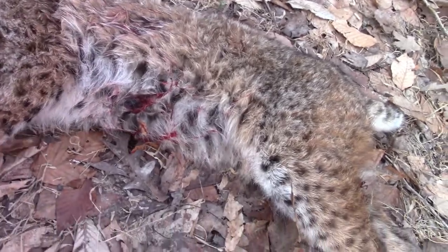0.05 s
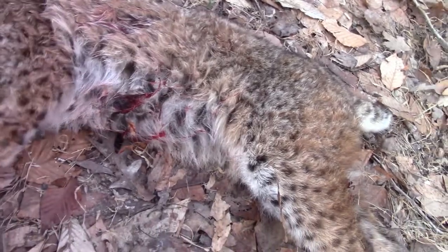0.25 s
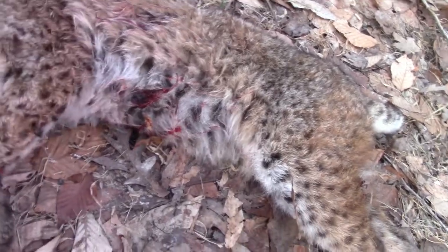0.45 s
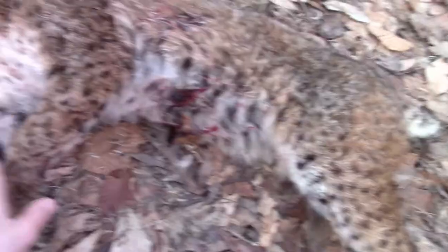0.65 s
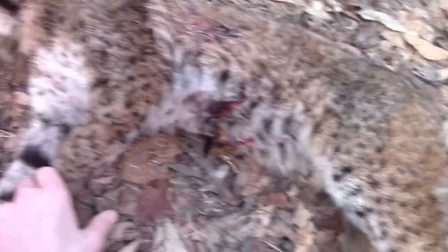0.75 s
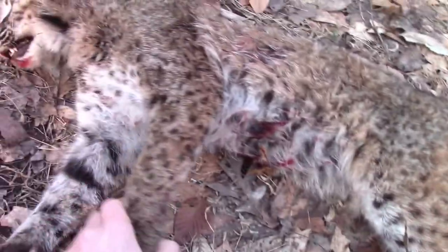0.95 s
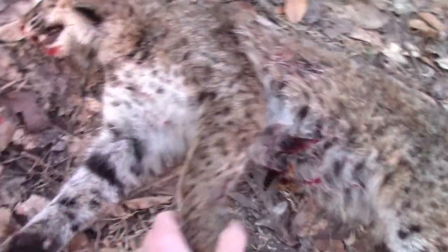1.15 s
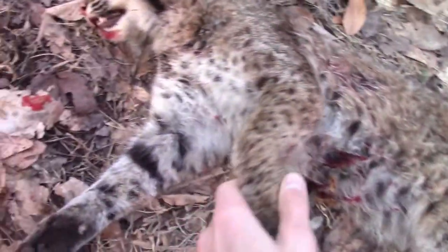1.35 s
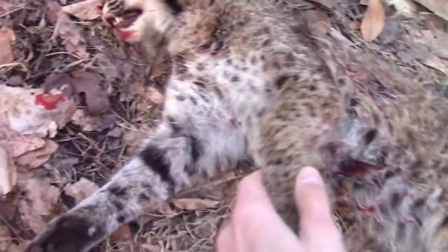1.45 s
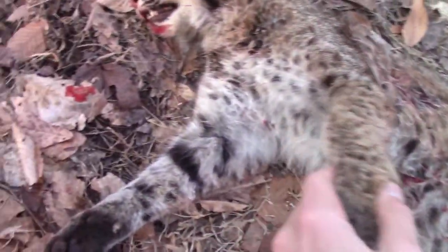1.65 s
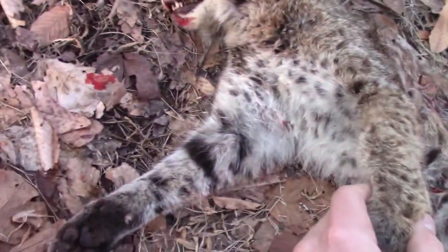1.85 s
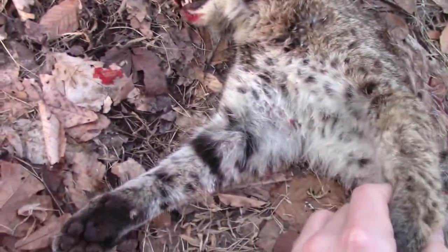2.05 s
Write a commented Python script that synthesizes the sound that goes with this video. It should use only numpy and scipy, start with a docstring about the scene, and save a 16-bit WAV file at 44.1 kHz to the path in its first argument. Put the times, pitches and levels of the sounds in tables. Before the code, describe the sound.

Faint crackling of dry leaf litter under a handled animal, one sharp snap, then scattered small ticks

```python
"""Furry body on dry leaves

A hand shifts a furry body on a bed of dry leaves outdoors, heard close by in stereo.
The litter rustles as dense tiny cracks that ring small resonators; one handful is crushed sharply.
Single leaves and stems snap as short bursts with ringing tones, and something hollow is tapped once.
Quiet air lies below as shaped, almost uncorrelated stereo noise.
"""
import sys
import numpy as np
from scipy import signal
from scipy.fft import rfft, irfft
from scipy.io import wavfile
from scipy.ndimage import map_coordinates

SR = 44100
rng = np.random.default_rng(int(sys.argv[2]) if len(sys.argv) > 2 else 0)


def generate_wav(sig):
    """Save sig (samples, or channels by samples) to the path in sys.argv[1] as 16-bit PCM at SR."""
    pcm = np.round(np.clip(np.atleast_2d(sig).T, -1, 1) * 32767).astype(np.int16)
    wavfile.write(sys.argv[1], SR, pcm)


N = 92610  # length in samples

# Stirring of the litter: start_s, level_db, treble_db (treble above level)
STIRRING = [(0, -53.5, -1.5), (.06, -54, 0.5), (.12, -60.5, 3), (.16, -47, -7.5), (.2, -52.5, -0.5),
            (.28, -55, 4), (.32, -62, 1), (.365, -55, 0.5), (.41, -47, 0), (.46, -57, 1), (.51, -61, -2.5),
            (.64, -69.5, 0), (.71, -56.5, -4), (.74, -57.5, -5.5), (.785, -51, -7), (.82, -60.5, -3),
            (.92, -62, -1.5), (.945, -54, -2), (1.0, -57, 3.5), (1.1, -59, 1), (1.18, -61, 1),
            (1.3, -56.5, -0.5), (1.4, -61.5, 1), (1.48, -57.5, -0.5), (1.62, -63, -0.5), (1.75, -62.5, -1),
            (1.92, -69, 0), (1.98, -71, -1), (2.04, -67.5, 3.5), (2.1, -70, 1)]
# Where the hand works: start_s, pan_db (left minus right)
HAND_PATH = [(0, 2.4), (.47, 2.4), (.6, 1), (1.1, .6), (1.3, 0), (2.1, 0)]
# The crushed handful: start_s, level_db, treble_db (treble above level)
CRUSHING = [(.2, -57, -7), (.216, -42, -6), (.220, -42, -6), (.2225, -28.5, -7), (.228, -23.5, -2),
            (.234, -26.5, 3), (.238, -30.5, 7.5), (.2405, -41, -2), (.25, -45.5, 8), (.256, -46.5, 3),
            (.272, -64, 5)]
# Single breaks: start_s, level_db (peak of the ringing body), pitch_hz, crack_db (crack against body)
SNAP_EVENTS = [(0.0257, -32, 1870, -12), (0.163, -31.5, 1440, -8), (0.2067, -34, 2990, -3),
               (0.2208, -25, 1100, -15), (0.225, -11.5, 2020, -22), (0.2321, -13.5, 1920, -14),
               (0.234, -11.5, 2640, -13), (0.2375, -31, 1080, -10), (0.3331, -37.5, 663, -10),
               (0.9241, -42.5, 2020, 2.5), (0.9771, -36.5, 2200, -5), (0.9939, -38, 2020, -2),
               (1.0085, -41, 2700, -6), (1.016, -41, 1510, 0), (1.0472, -46.5, 1800, 8.5),
               (1.0497, -40, 2640, 6.5), (1.0908, -37.5, 1590, 2), (1.1248, -47, 670, 2),
               (1.1995, -46.5, 1110, -3), (1.2209, -48.5, 2730, 14), (1.2642, -28, 1840, 0.5),
               (1.2938, -42.5, 1680, -6), (1.2962, -43, 1500, 8), (1.3092, -37, 1070, -12),
               (1.311, -44, 2520, 4), (1.3135, -49.5, 404, 0), (1.3295, -46, 2500, 7),
               (1.3315, -44.5, 890, 8.5), (1.3339, -34, 1890, -9), (1.3792, -40, 1420, 5),
               (1.3919, -26.5, 1370, 2), (1.3954, -32.5, 1240, 3), (1.431, -43.5, 2300, 7),
               (1.4366, -44, 770, 2), (1.4525, -40, 1800, 1), (1.4692, -33, 1620, -5),
               (1.4708, -43, 2480, -6), (1.4843, -44.5, 2400, 5.5), (1.4931, -43, 2250, -5),
               (1.5, -47, 1230, 0), (1.5236, -38.5, 2600, -2.5), (1.5515, -48.5, 2400, 6),
               (1.5543, -37, 2000, -2), (1.5713, -53, 2110, 8), (1.59, -27, 1580, -11),
               (1.6068, -38, 2280, -11), (1.7155, -39.5, 2600, -5), (1.7689, -27, 1780, -4.5),
               (1.7702, -44, 760, -6), (1.809, -42, 1760, -4), (1.8185, -45, 2820, 0),
               (1.8499, -48, 2340, 9.5), (1.909, -37.5, 1720, -6), (2.034, -53, 1600, 8.5)]
# Colour of the leaves by leaf pitch: pitch_hz, level_db (relative)
LEAF_COLOUR = [(350, -56), (500, -22), (750, -7), (1300, -4), (2000, -1), (2900, -1), (4000, -15),
               (6100, -7), (8500, -13.5), (11400, -23), (15000, -28)]
# Colour of the outdoor air: pitch_hz, level_db (relative)
AIR_COLOUR = [(12, -43), (20, -11.5), (146, -12), (660, -0.5), (1260, -6), (1570, 1.5), (2140, -8),
              (2530, -5), (3440, -7), (6010, -11), (13500, -23), (16000, -40)]
# How alike the air is on left and right: pitch_hz, correlation (0 to 1)
AIR_LIKENESS = [(30, 0.051), (15000, 0.067)]
# Tones of a snapped leaf: pitch_ratio, share (signed amplitude)
SNAP_PARTIALS = [(1, 0.95), (1.68, -0.42)]
# Tones of the hollow knock: pitch_hz, level_db, t60_s (time to fall 60 dB)
KNOCK_TONES = [(462, -52, 0.16), (520, -45, 0.018), (1000, -52, .01)]

# Stereo: the louder side also hears it earlier; the heaps spread by up to SCATTER_US
LEAD_US_PER_DB, SCATTER_US = 8, 26
# Rustle: the spread is the mean of a random boost, the clump the size of a slow drift
CRACKS_PER_S, CRACK_SPREAD_DB, CLUMP_DB = 12000, 0.5, 2
LEAF_CYCLES = 6.6  # cycles of a leaf's pitch in its t60
LEAF_SIZES, ONE_LEAF_REACH, HEAPS = 36, .3, 4  # reach in leaf sizes
TREBLE_FROM_HZ = 3800
THIN_HZ = 271  # small dry leaves radiate little bass
# Lone ticks once the body is dragged: level against the rustle, reach in leaf sizes
TICKS_FROM_S, TICKS_PER_S, TICK_SPREAD_DB, TICK_DB, TICK_REACH = .92, 250, 2, -4, 2.2
# Crush: the handful booms a little, then is thinned
CRUSH_PER_S, CRUSH_SPREAD_DB, CRUSH_CLUMP_DB = 20500, 2.5, 2.5
HEAP_HZ, HEAP_DB, HEAP_T60_S, CRUSH_THIN_HZ = 770, -19.5, .007, 634
# Snaps: the run of small breaks dies 40 dB in SNAP_S; the body is thin below a share of its pitch
SNAP_S, SNAP_CYCLES, SNAP_THIN = 0.0042, 5.2, 0.62
CRACK_HZ, CRACK_TOP_HZ = 3340, 8740
CRACK_RING_HZ, CRACK_RING_T60_S, CRACK_RING = 6150, 0.0017, 0.18  # one favoured bright tone
KNOCK_S, KNOCK_THIN_HZ = 1.6815, 340
AIR_DB = -60.5
CUTOFF_HZ = 16600


def amp(db):
    """Decibels to amplitude."""
    return 10 ** (np.asarray(db) / 20)


def rms_one(x):
    """Bring a sound to an RMS of 1."""
    return x / np.sqrt(np.mean(x ** 2) + 1e-20)


def in_time(rows, **ends):
    """Draw each table column as a line over the scene."""
    s, *columns = np.transpose(rows)
    return [np.interp(np.arange(N) / SR, s, c, **ends) for c in columns]


def at_hz(points, hz):
    """Read a colour curve along log pitch."""
    curve_hz, values = np.transpose(points)
    return np.interp(np.log(hz), np.log(curve_hz), values)


def drift(rate_hz):
    """Slow random motion with an RMS of 1: noise through a two-pole lowpass."""
    r = np.exp(-2 * np.pi * rate_hz / SR)
    noise = rng.standard_normal(N + SR)
    return rms_one(signal.lfilter([1], [1, -2 * r, r * r], noise)[SR:])  # skip the settling


def highpass(x, hz, order):
    """Thin a sound with a Butterworth highpass."""
    return signal.sosfilt(signal.butter(order, hz, "high", fs=SR, output="sos"), x)


def ring(clicks, hz, t60_s):
    """Damped resonator: a unit click sets a sine of about height 1 ringing."""
    r, w = amp(-60 / (t60_s * SR)), 2 * np.pi * hz / SR
    return signal.lfilter([0, np.sin(w)], [1, -2 * r * np.cos(w), r * r], clicks + 1e-18)


def place(x, extra_us=0):
    """Level and time differences between left and right follow the hand."""
    pan_db, = in_time(HAND_PATH)
    half_lead = (LEAD_US_PER_DB * pan_db + extra_us) * SR / 2e6  # in samples
    sides = []
    for side in (1, -1):
        shifted = map_coordinates(x, [np.arange(N) + side * half_lead], order=3)
        sides.append(amp(side * pan_db / 2) * shifted)
    return np.array(sides)


def cracks(level_db, treble_db, per_s, spread_db, clump_db, reach=ONE_LEAF_REACH):
    """Random clumped cracks, each swelling and dying in a leaf or, with reach, its neighbours in size."""
    clump = clump_db * drift(70)
    boost_db = spread_db * np.minimum(rng.exponential(1, N), 5) + clump
    sizes = amp(boost_db) * rng.choice([-1, 1], N)
    born = sizes * (rng.random(N) < per_s / SR)
    pitches = np.geomspace(400, 15000, num=LEAF_SIZES)
    odds = np.sqrt(pitches)  # small leaves crack oftener
    dealt = rng.choice(LEAF_SIZES, N, p=odds / odds.sum())
    low, high = np.zeros((2, HEAPS, N))
    for k, hz in enumerate(pitches):
        t60_s = LEAF_CYCLES / hz
        struck = born * np.exp(-((dealt - k) / reach) ** 2)
        leaf = rms_one(ring(ring(struck, hz, t60_s), hz, t60_s))  # two in a row swell, then die
        leaf = leaf * amp(at_hz(LEAF_COLOUR, hz)) * np.sqrt(hz)
        band = low if hz < TREBLE_FROM_HZ else high
        band[k % HEAPS] += leaf
    low = low / low.sum(0).std()
    high = high / high.sum(0).std()
    heaps = amp(level_db) * (low + amp(treble_db) * high)
    # each heap lies at its own angle
    return sum(place(h, SCATTER_US * z) for h, z in zip(heaps, np.linspace(-1, 1, num=HEAPS)))


def rustle():
    """The stirred litter: dense cracks, each in about one leaf, with lone wider ticks later."""
    stir_db, treble_db = in_time(STIRRING)
    litter = cracks(stir_db, treble_db, CRACKS_PER_S, CRACK_SPREAD_DB, CLUMP_DB)
    ticks = cracks(stir_db + TICK_DB, treble_db, TICKS_PER_S, TICK_SPREAD_DB, CLUMP_DB, TICK_REACH)
    return litter + (np.arange(N) > TICKS_FROM_S * SR) * ticks


def crush():
    """A crushed handful: denser cracks also excite a short boom in the heap, with the bass thinned."""
    level_db, treble_db = in_time(CRUSHING, left=-99, right=-99)
    handful = cracks(level_db, treble_db, CRUSH_PER_S, CRUSH_SPREAD_DB, CRUSH_CLUMP_DB)
    boomy = handful + amp(HEAP_DB) * ring(handful, HEAP_HZ, HEAP_T60_S)
    return highpass(boomy, CRUSH_THIN_HZ, 3)


def snaps():
    """One break and a dying run of smaller ones ring two leaf tones, with a bright noisy crack."""
    out, t = np.zeros(N + SR), np.arange(1500) / SR
    fade = amp(-40 * t / SNAP_S)
    crack_top = signal.butter(2, CRACK_TOP_HZ, fs=SR, output="sos")
    noises = rng.standard_normal((len(SNAP_EVENTS), 2, len(t)))
    for (start_s, level_db, hz, crack_db), (breaks, hiss) in zip(SNAP_EVENTS, noises):
        burst = 0.38 * breaks * fade * (np.abs(breaks) > 1.5)  # only the strong breaks
        burst[0] = 2
        body = sum(share * ring(burst, ratio * hz, SNAP_CYCLES / hz) for ratio, share in SNAP_PARTIALS)
        body = highpass(body, SNAP_THIN * hz, 5)
        crack = signal.sosfilt(crack_top, highpass(hiss * fade, CRACK_HZ, 2))
        crack = crack + CRACK_RING * ring(crack, CRACK_RING_HZ, CRACK_RING_T60_S)
        snap = body / np.abs(body).max() + amp(crack_db) * crack / np.abs(crack).max()
        i = int(start_s * SR)
        out[i:i + len(t)] += amp(level_db) * snap
    return place(out[:N])


def knock():
    """One soft tap on something hollow: a click rings a few damped tones, with the bass thinned."""
    click = np.zeros(N)
    click[int(KNOCK_S * SR)] = 1
    tones = sum(amp(level_db) * ring(click, hz, t60_s) for hz, level_db, t60_s in KNOCK_TONES)
    return highpass(place(tones), KNOCK_THIN_HZ, 2)


def air():
    """Steady noise with the colour of the quiet outdoors; mid and side shares set its likeness."""
    hz = np.maximum(np.arange(N // 2 + 1) * SR / N, 1)
    alike = np.clip(at_hz(AIR_LIKENESS, hz), 0, 1)
    mid, side = rfft(rng.standard_normal((2, N))) * amp(at_hz(AIR_COLOUR, hz))
    stereo = np.sqrt(1 + alike) * mid + np.sqrt(1 - alike) * side * [[1], [-1]]
    return amp(AIR_DB) * rms_one(irfft(stereo, N))


def scene():
    """Thinned leaf sounds, the hollow tap and the air together."""
    leaves = highpass(rustle() + crush() + snaps(), THIN_HZ, 4)
    return leaves + knock() + air()


def record(dry):
    """The top is cut steeply, 70 dB down from the cutoff up."""
    return signal.sosfilt(signal.cheby2(14, 70, CUTOFF_HZ, fs=SR, output="sos"), dry)


dry = scene()
out = record(dry)
generate_wav(out)
```